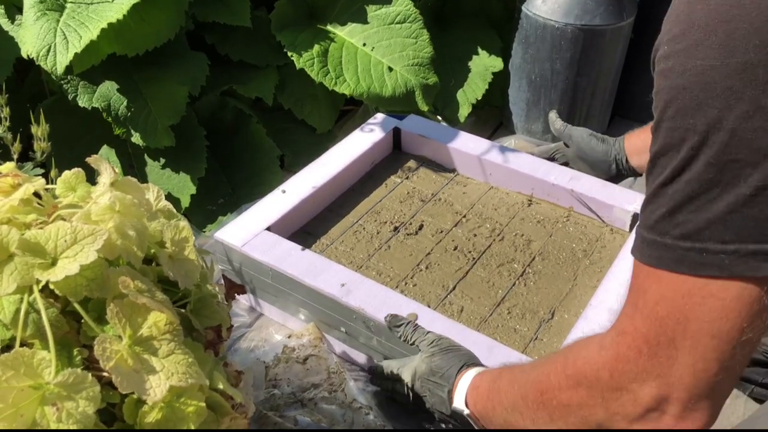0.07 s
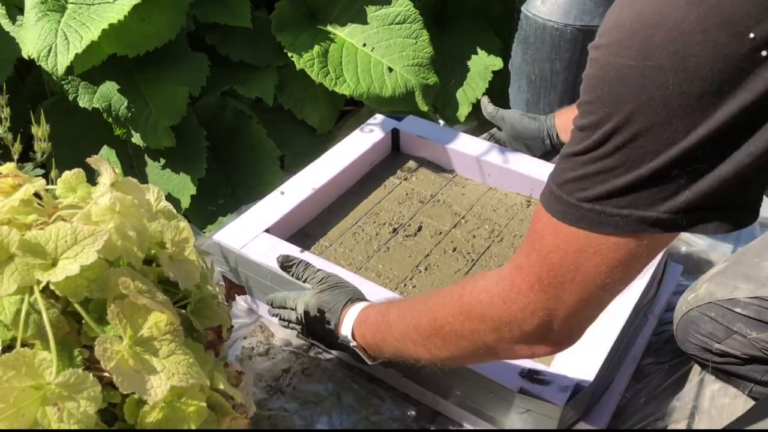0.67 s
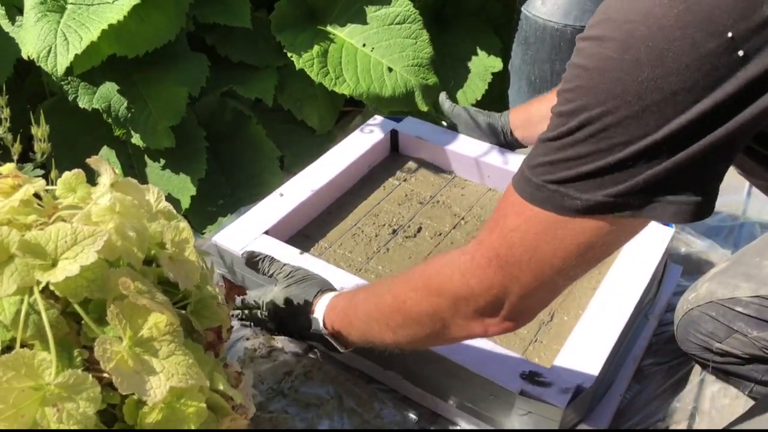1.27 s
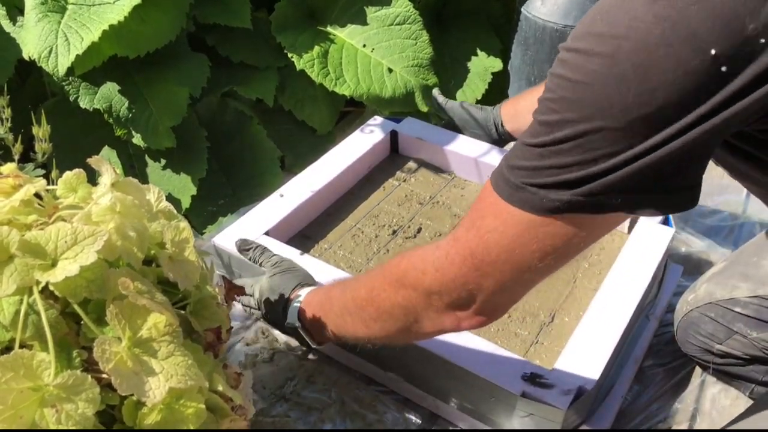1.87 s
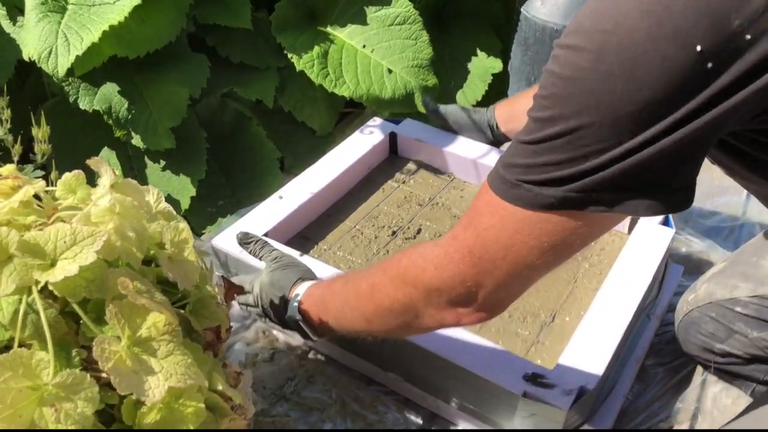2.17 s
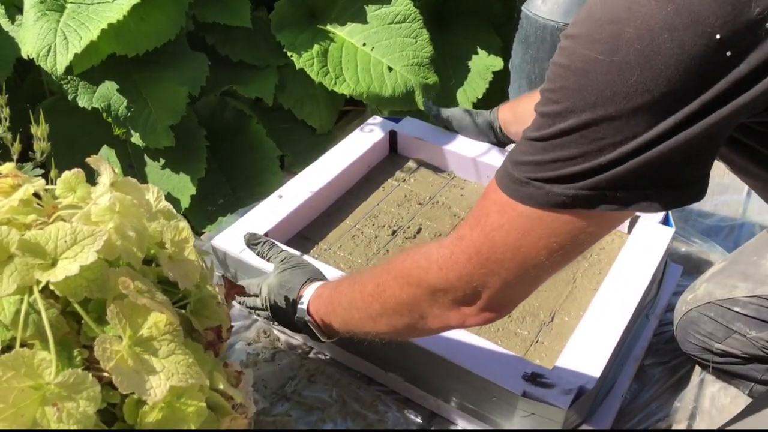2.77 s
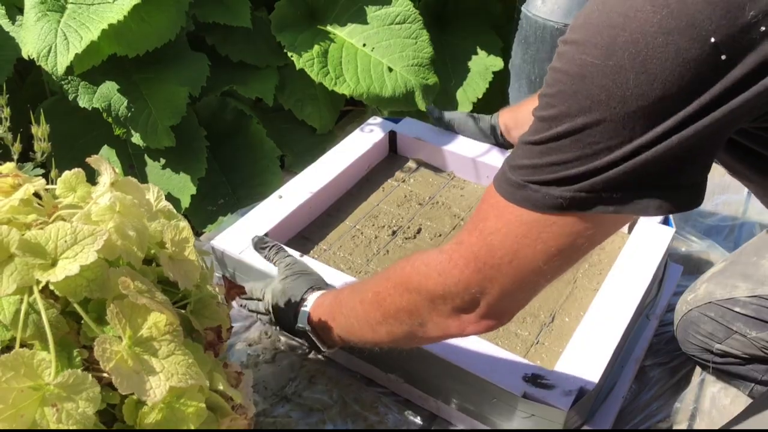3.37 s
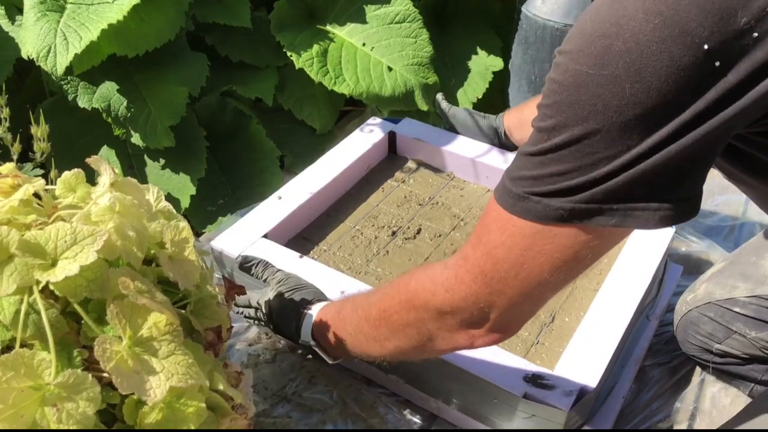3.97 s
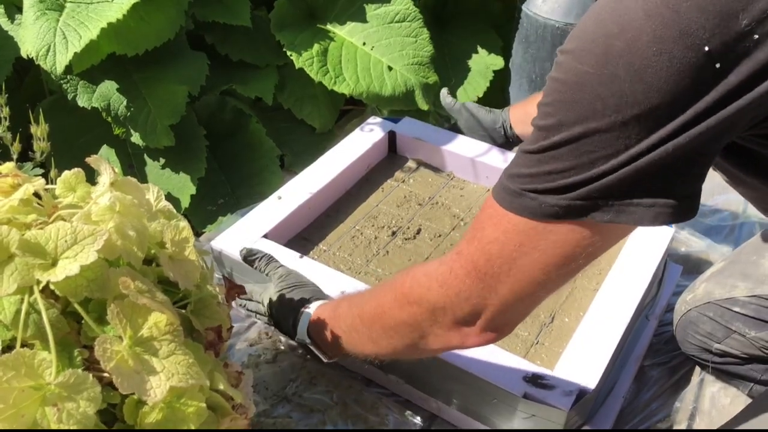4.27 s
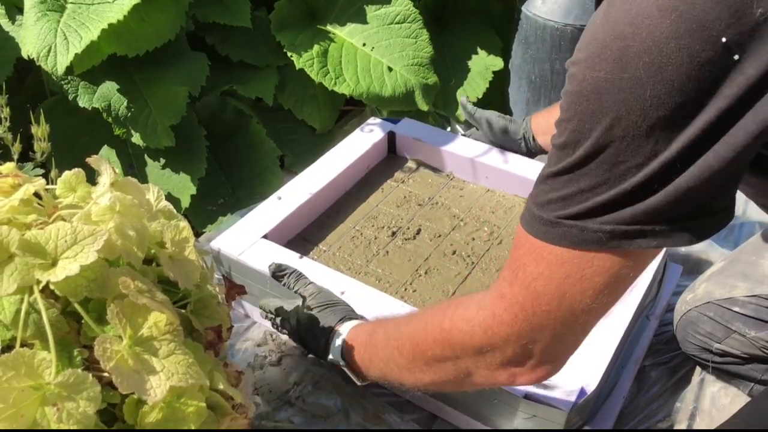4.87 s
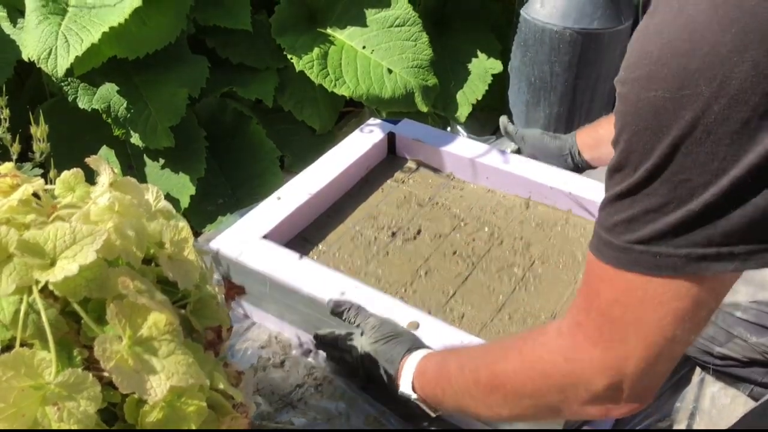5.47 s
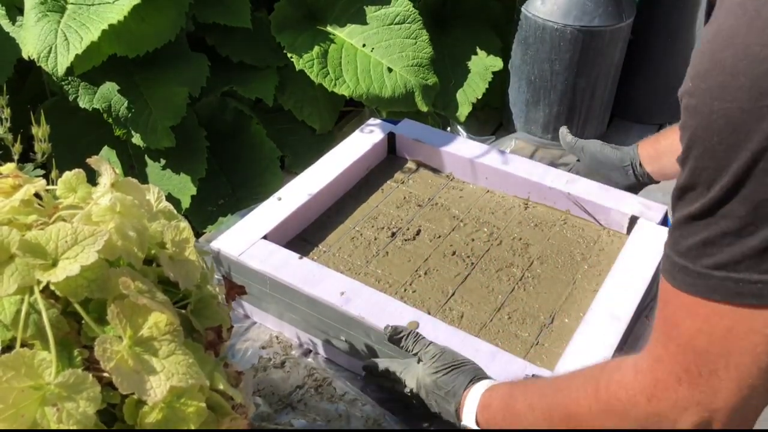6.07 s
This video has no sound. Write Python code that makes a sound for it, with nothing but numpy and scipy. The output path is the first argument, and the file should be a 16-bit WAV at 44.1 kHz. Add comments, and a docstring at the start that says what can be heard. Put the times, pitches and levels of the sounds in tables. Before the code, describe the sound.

Quick, steady thuds and knocks as a concrete-filled foam mold is rocked on deck boards, grit crunching and plastic rustling softly.

```python
"""Knocks on a wooden deck, about five a second: a foam mold of wet concrete is rocked by hand.
It often lands on one edge, then the other: the boards thud, the frame knocks, grit crunches underneath.
Gloves and a plastic sheet rustle in step with the shaking, with a few longer scrapes.
The garden returns a short, soft echo; behind it lie a faint distant hum and an outdoor rumble."""
import sys
import numpy as np
from scipy import signal
from scipy.fft import rfft, irfft, next_fast_len
from scipy.io import wavfile
from scipy.ndimage import map_coordinates

SR = 44100
rng = np.random.default_rng(int(sys.argv[2]) if len(sys.argv) > 2 else 0)


def persist_wave(psi):
    """Save psi, clipped to +-1, as 16-bit WAV."""
    counts = np.round(np.clip(psi, -1, 1) * 32767).astype(np.int16)
    wavfile.write(sys.argv[1], SR, np.atleast_2d(counts).T)


N = 274743

# Shakes of the mold. Each row: start in seconds, strength in dB, extra weight on the boards in dB,
# extra grit in dB, knock pitch in Hz, board pitch at that spot in Hz, wait for the far edge in seconds,
# far edge over near edge in dB.
SHAKES = [(0.022, -39, -3, -6, 1057, 440, .028, 10), (0.2179, -36, -6.5, -3, 1420, 219, 0.026, -4.5),
          (0.447, -42, 1, 0, 1144, 370, 0.023, 5), (0.6767, -39.5, 5, 0.5, 1160, 475, 0.0056, -15.5),
          (0.868, -38.5, 0.5, 2, 1075, 340, .014, -13), (1.0469, -37.5, -2, -3, 1082, 354, 0.0067, 5.5),
          (1.2094, -32, -2, -4, 1180, 330, 0.019, -2.5), (1.373, -39, -1.5, -0.5, 1154, 260, 0.026, -4.5),
          (1.5457, -33.5, -1, -4.5, 1000, 338, 0.036, -1.5), (1.711, -43, 3.5, 2.5, 1310, 330, 0.031, 2),
          (1.8863, -35, -1, -2, 1197, 338, 0.025, 4.5), (2.0587, -36, -3.5, -4.5, 1100, 268, 0.022, -0.5),
          (2.231, -33.5, 0, -3, 1103, 340, 0.013, -10.5), (2.4139, -30.5, -2, -6.5, 1090, 380, 0.0061, -7),
          (2.6279, -28, -5.5, -9, 1120, 346, 0.0026, -10.5),
          (2.8386, -34, -4.5, -4.5, 1034, 268, 0.0028, -2.5), (3.035, -35, 2, -3.5, 1100, 396, 0.0039, -12),
          (3.2491, -34.5, 1.5, -0.5, 1033, 347, 0.0066, -1.5),
          (3.4554, -29.5, -3.5, -5.5, 1200, 390, 0.0047, -12.5),
          (3.6545, -32, -1, -1, 1036, 340, .0032, -5), (3.8665, -33.5, 0.5, -3, 1030, 262, 0.0041, -2),
          (4.0742, -33, -4.5, -3, 950, 314, 0.012, -3.5), (4.2947, -32.5, -4, -5, 1070, 244, 0.0045, 0.5),
          (4.5004, -37.5, 2.5, -1.5, 1010, 368, 0.0091, -6.5),
          (4.719, -35.5, -2.5, -3, 963, 247, 0.0035, -2), (4.9798, -40, -4.5, -1.5, 995, 230, 0.0058, -9),
          (5.2507, -48.5, 3, 4, 1034, 357, 0.0072, 2.5), (5.5083, -42.5, 2, 5, 1480, 358, 0.0046, -23),
          (5.7917, -37, 3, 2, 1150, 340, .0045, -12.5), (6.0756, -31, -7.5, -4, 1030, 300, 0.0058, -8)]
DEPTH_DB, CRUSH_S = -1, 0.032
FAR_WEIGHT_DB, FAR_DEPTH_DB, FAR_GRIT_DB = -1.5, 1.5, 1.13
FAR_PITCH_RATIO, FAR_CRUSH_RATIO = 1.135, 0.76
FLAT_DEPTH_DB, FLAT_WAIT_S, CRACK_DB = 10.5, 0.0081, 5.5


def landings():
    """Near edge, then far edge: together they bend the boards deeply, apart the far one cracks."""
    for s, db, weight_db, grit_db, pitch_hz, spot_hz, wait_s, far_db in SHAKES:
        yield s, db, weight_db, DEPTH_DB, grit_db, 0, pitch_hz, spot_hz, CRUSH_S
        flatness = np.exp(-wait_s / FLAT_WAIT_S)
        depth_db = DEPTH_DB + FAR_DEPTH_DB + FLAT_DEPTH_DB * flatness
        crack_db = CRACK_DB * (1 - flatness)
        yield (s + wait_s, db + far_db, weight_db + FAR_WEIGHT_DB, depth_db, grit_db + FAR_GRIT_DB,
               crack_db, pitch_hz * FAR_PITCH_RATIO, spot_hz, CRUSH_S * FAR_CRUSH_RATIO)


# Echo spectra of boards and grit. Each row: frequency in Hz, relative density in dB.
THUD_ECHO = [(20, -72), (45, -33), (90, -9), (150, 12.5), (210, 3.5), (350, 7.5), (550, -0.5), (900, -16.5),
             (3000, -34)]
GRIT_ECHO = [(300, 10), (900, 8), (2000, 2.5), (4000, -3), (7000, -6), (10000, -9), (15000, -17)]
USUAL_DB, DEPTH_PER_DB, DULLING_PER_DB, CRUSH_GROWTH_PER_DB = -37, 0.5, 0.5, 0.0742


def mold():
    """Each landing sounds boards, frame and grit; a soft one rolls: deeper, duller, a longer crush."""
    track, t = np.zeros(N), np.arange(SR // 3) / SR
    lead = t[:SR // 50]
    for s, knock_db, weight_db, depth_db, grit_db, crack_db, pitch_hz, spot_hz, crush_s in landings():
        thud_db, crunch_db = knock_db + weight_db, knock_db + grit_db
        softness_db = USUAL_DB - knock_db
        crush_s *= np.exp(CRUSH_GROWTH_PER_DB * softness_db)
        depth_db += DEPTH_PER_DB * softness_db
        dull_db = DULLING_PER_DB * (USUAL_DB - thud_db)
        deck_tail = amp(-16) * garden_echo(t, THUD_ECHO, near_db=5)
        boards = thud(t, depth_db, dull_db, spot_hz) + deck_tail
        frame = knock(t, pitch_hz, crack_db) + amp(-23.5) * frame_tail(t, pitch_hz)
        grit = crunch(t, crush_s) + amp(-16) * garden_echo(t, GRIT_ECHO, near_db=4)
        add(track, s, amp(thud_db) * boards + amp(knock_db) * frame + amp(crunch_db) * grit)
        add(track, s - lead[-1], amp(crunch_db - 11) * scuff(lead))
    return track


# Modes of the loaded deck. Each row: frequency in Hz, width in Hz, relative level in dB.
BOARD_MODES = [(90.3, 25.3, -5), (140, 32, -3.5), (231.9, 27.3, -3.5), (261.3, 37, -4), (340, 87, -1),
               (371.2, 63.3, 1.5), (484, 121.6, -3), (555, 70, -2), (634, 85, -9.5)]
DEEP_BELOW_HZ, DULL_ABOVE_HZ = 180, 430
SPOT_DB, SPOT_OCTAVES, USUAL_SPOT_HZ, SPAN_DB_PER_OCTAVE = 5, 0.33, 330, 6.5


def thud(t, depth_db, dull_db, spot_hz):
    """A heavy push bends the boards, favouring the modes near the pitch of the struck spot."""
    push = t / 0.00015 * np.exp(-t / 0.00022)
    depth_db += SPAN_DB_PER_OCTAVE * np.log2(USUAL_SPOT_HZ / spot_hz)  # deeper towards mid-span
    modes = []
    for hz, width, db in BOARD_MODES:
        favour_db = SPOT_DB * np.exp(-(np.log2(hz / spot_hz) / SPOT_OCTAVES) ** 2)
        tilt_db = depth_db * (hz < DEEP_BELOW_HZ) - dull_db * (hz > DULL_ABOVE_HZ)
        modes.append((hz, width, db + favour_db + tilt_db))
    return unit(ring(push, modes, vary_db=2), size=400)


# Modes of the foam frame. Each row: multiple of the knock pitch, width in Hz, relative level in dB.
FRAME_MODES = [(0.896, 136, 5.5), (1.074, 175, 4), (1.33, 302, -3.5), (1.9, 546, -11.5)]


def knock(t, pitch_hz, crack_db):
    """The stiff foam edge slaps down and rings for a few cycles; a crack lifts its top mode."""
    slap = (t == 0) + 0.05 * rng.standard_normal(len(t)) * fade(t, 0.016)
    modes = [(k * pitch_hz, width, db + crack_db * (k > 1.6)) for k, width, db in FRAME_MODES]
    return unit(ring(slap, modes, vary_db=-0.5), size=176)


# Echo spectrum of the knock. Each row: frequency in Hz, relative density in dB.
KNOCK_ECHO = [(250, 2), (600, -8), (1050, 0.5), (1600, -3), (2300, -8), (4000, -26.5), (12000, -66)]
AFTERRING_WIDTH_HZ, AFTERRING_DB = 100, -4.5


def frame_tail(t, pitch_hz):
    """The knock's echo, tinted by the frame's own faint ring."""
    echo = garden_echo(t, KNOCK_ECHO, near_db=5)
    return echo + ring(echo, [(pitch_hz, AFTERRING_WIDTH_HZ, AFTERRING_DB)], vary_db=2)


# Spectrum of crushed grit. Each row: frequency in Hz, relative density in dB.
GRIT_SPECTRUM = [(200, -20), (700, 0), (1500, -1.5), (2200, -3), (3200, -3.5), (4500, -6), (7000, -8),
                 (10000, -10.5), (13000, -17), (16000, -24)]


def crunch(t, crush_s):
    """Grit is crushed under the edge: a snap if it lands squarely, a longer rasp if it rolls."""
    pressure = (1 - np.exp(-t / 0.0004)) * fade(t, max(crush_s, 0.005))
    grit = grains(len(t), spread_db=5)
    return unit(coloured(grit * pressure, GRIT_SPECTRUM), size=176)


def scuff(t):
    """The edge skids on the grit just before it lands."""
    return (noise(len(t), GRIT_SPECTRUM) * fade(t, 0.011))[::-1]


# Spectrum of the plastic sheet. Each row: frequency in Hz, relative density in dB.
SHEET_SPECTRUM = [(150, -58), (600, -12), (1500, 3.5), (2500, 2), (4200, 5.5), (6500, 3), (10000, 1.5),
                  (13000, -2), (16000, -10)]
# Faint squeak of glove rubber. Each row: frequency in Hz, width in Hz, relative level in dB.
GLOVE_MODES = [(4170, 150, -2)]
# Snapping folds of the sheet. Each row: start in seconds, relative level in dB.
CRINKLES = [(0.5916, -49.5), (0.5973, -51), (0.6585, -52), (5.7206, -61)]


def rustle():
    """Gloves and sheet slide in swells of tiny grains, joined by scrapes, crinkles and a little echo."""
    track = scrapes()
    for s, length_s, db in slides():
        size = int(length_s * SR)
        swell = np.sqrt(np.abs(np.sin(np.linspace(0, np.pi, size))))
        friction = grains(size, spread_db=8) * flutter(size, depth_db=2)
        squeak = ring(friction, GLOVE_MODES, vary_db=1)
        add(track, s, amp(db) * swell * unit(coloured(friction + squeak, SHEET_SPECTRUM)))
    t = np.arange(SR // 50) / SR
    for s, db in CRINKLES:
        add(track, s, amp(db) * noise(len(t), SHEET_SPECTRUM) * fade(t, 0.024))
    tail = garden_echo(np.arange(SR // 3) / SR, GRIT_ECHO, near_db=-5)
    echo = amp(-10) * signal.fftconvolve(track, tail / np.linalg.norm(tail))[:N]
    return amp(1.64) * (track + echo)


# How hard gloves and sheet rub. Each row: time in seconds, relative level in dB.
RUBBING = [(0, -74), (0.3, -66.5), (0.64, -77), (1.0, -69.5), (1.35, -71), (1.85, -66.5), (2.45, -97.5),
           (3.2, -74.5), (3.75, -73), (4.45, -74), (4.7, -66.5), (4.95, -71.5), (5.4, -67.5), (5.65, -77.5),
           (6.0, -67.5)]
# Lift, push down, last slip. Each row: start in cycles, length in cycles, relative level in dB.
STROKES = [(.36, 0.22, -7), (0.611, 0.27, -1), (.88, 0.12, 0)]


def slides():
    """The hands slide in three short strokes after each shake."""
    beats = [row[0] for row in SHAKES]
    cycles = np.diff(beats)
    for beat_s, cycle_s in zip(beats, [*cycles, cycles[-1]]):
        for start, length, db in STROKES:
            middle_s = beat_s + (start + length / 2) * cycle_s
            rubbing_db = np.interp(middle_s, *np.transpose(RUBBING))
            yield beat_s + start * cycle_s, length * cycle_s, db + rubbing_db


# Drags of the mold. Each row: start in seconds, length in seconds, relative level in dB.
SCRAPES = [(0.002, 0.031, -56), (0.375, .075, -60.5), (0.567, 0.19, -63.5), (0.756, 0.073, -65),
           (5.131, 0.032, -70.5), (5.382, .04, -68.5), (5.705, 0.064, -65.5)]
SCRAPE_ATTACK_S = 0.0035


def scrapes():
    """The sheet rasps as the mold is dragged over it, catching at once and easing off."""
    track = np.zeros(N)
    for s, length_s, db in SCRAPES:
        t = np.arange(int(length_s * SR)) / SR
        drag = (1 - np.exp(-t / SCRAPE_ATTACK_S)) * np.sqrt(1 - t / length_s)
        rasp = unit(coloured(grains(len(t), spread_db=8), SHEET_SPECTRUM))
        add(track, s, amp(db) * drag * flutter(len(t), depth_db=2) * rasp)
    return track


# Decay of the garden. Each row: frequency in Hz, time to fall 60 dB in seconds.
ECHO_T60 = [(120, 0.46), (400, 0.2), (1200, 0.28), (4000, 0.29), (14000, 0.14)]


def garden_echo(t, spectrum, near_db):
    """A diffuse tail: deck and body answer at once, fence and plants a little longer."""
    hz, lag_s, bands = signal.stft(noise(len(t), spectrum), SR, nperseg=256)
    decay = fade(lag_s, along(ECHO_T60, hz)[:, None])
    far = signal.istft(bands * decay, SR, nperseg=256)[1][:len(t)]
    near = noise(len(t), spectrum) * fade(t, 0.16)
    onset = 1 - np.exp(-(t / 0.0049) ** 2)
    return (far + amp(near_db) * near) * onset


# Course of the distant hum. Each row: time in seconds, pitch in Hz, level in dB.
HUM = [(4.9, 177, -93), (5.15, 187.6, -98), (5.22, 203.3, -66), (5.35, 175, -74), (5.44, 195, -69),
       (5.56, 178, -76), (5.7, 168, -106), (6.05, 159.3, -93), (6.2, 180.5, -67)]


def hum():
    """A low, wavering tone from far away drifts in and out."""
    s, pitch_hz, db = np.transpose(HUM)
    t = np.arange(N) / SR
    phase = 2 * np.pi * np.cumsum(np.interp(t, s, pitch_hz)) / SR
    return amp(np.interp(t, s, db)) * unit(np.sin(phase) * flutter(N, depth_db=1.5))


# Spectrum of the garden's background. Each row: frequency in Hz, relative density in dB.
RUMBLE_SPECTRUM = [(20, -31), (35, -28), (52, 10), (85, 7.5), (160, 1), (300, -4.5), (600, -9.5),
                   (1200, -11), (3000, -26.5), (8000, -23), (16000, -31.5)]


def rumble():
    """Faint, steady outdoor noise, mostly bass."""
    return amp(-72) * noise(N, RUMBLE_SPECTRUM)


def amp(db):
    """Decibels to gain."""
    return 10 ** (np.asarray(db) / 20)


def unit(x, size=None):
    """Scale to rms 1, over the first size samples if given."""
    return x / np.sqrt(np.mean(x[:size] ** 2) + 1e-20)


def along(points, hz):
    """Interpolate (Hz, value) points on a log axis."""
    f, v = np.transpose(points)
    return np.interp(np.log(hz + 1), np.log(f), v)


def filtered(x, response):
    """Apply a frequency response."""
    size = next_fast_len(len(x) + SR // 8)
    return irfft(rfft(x, size) * response(np.fft.rfftfreq(size, 1 / SR)), size)[:len(x)]


def coloured(x, spectrum):
    """Shape x by (Hz, dB) points."""
    return filtered(x, lambda hz: amp(along(spectrum, hz)))


def noise(size, spectrum):
    """Coloured noise of rms 1."""
    return unit(coloured(rng.standard_normal(size), spectrum))


def ring(force, modes, vary_db):
    """A body's answer to a force; each strike weights and shifts the modes anew."""
    chance = rng.uniform(-1, 1, (len(modes), 2))
    struck = [(hz * np.exp(0.025 * detune), width, amp(db + vary_db * weight))
              for (hz, width, db), (detune, weight) in zip(modes, chance)]
    return filtered(force, lambda f: sum(
        (-1) ** k * gain * 1j * f * width / (hz * hz - f * f + 1j * f * width)
        for k, (hz, width, gain) in enumerate(struck)))


def fade(t, t60):
    """Exponential decay, 60 dB in t60 seconds."""
    return np.exp(-np.log(1000) * t / t60)


def grains(size, spread_db):
    """Noise of rms 1 in half-millisecond grains of uneven strength."""
    strength = np.repeat(rng.uniform(-1, 1, size // 20 + 1), 20)[:size]
    return unit(rng.standard_normal(size) * amp(spread_db * strength))


def flutter(size, depth_db, rate_hz=90):
    """A smoothly wandering random gain."""
    at = np.arange(size) * rate_hz / SR
    return amp(depth_db * map_coordinates(rng.standard_normal(int(at[-1]) + 3), [at]))


def add(track, s, sound):
    """Mix a sound in at s seconds."""
    part = track[max(0, round(s * SR)):][:len(sound)]
    part += sound[:len(part)]


def scene():
    """The mold and the rustle over the rumble and the hum, in mono."""
    air = rumble()
    return (mold() + rustle() + hum() + air)[None]


LOW_CUT_HZ, TOP_HZ = 45, 16100


def record(dry):
    """Roll off the deep bass and cut the highest treble steeply."""
    low_cut = signal.butter(4, LOW_CUT_HZ, "high", fs=SR, output="sos")
    thinned = signal.sosfilt(low_cut, dry[0])
    return filtered(thinned, lambda hz: 1 / np.sqrt(1 + (hz / TOP_HZ) ** 200))[None]


dry = scene()
out = record(dry)
persist_wave(out)
```